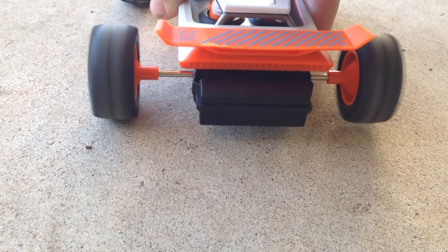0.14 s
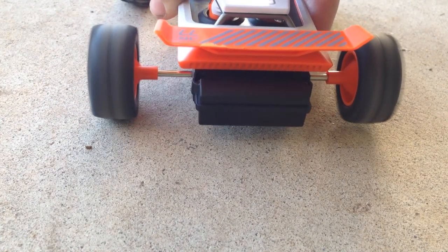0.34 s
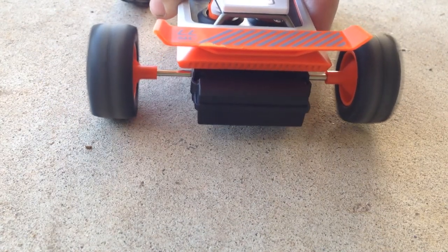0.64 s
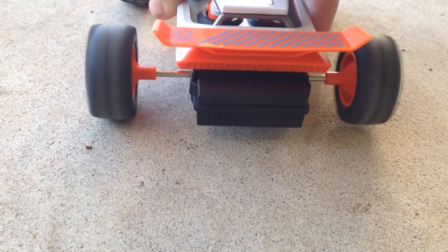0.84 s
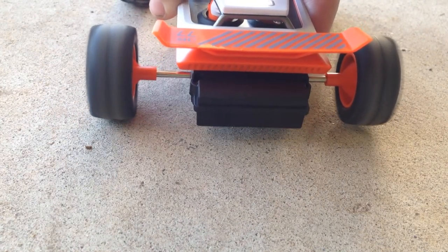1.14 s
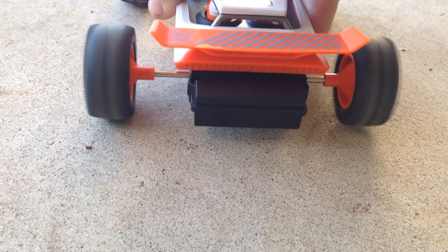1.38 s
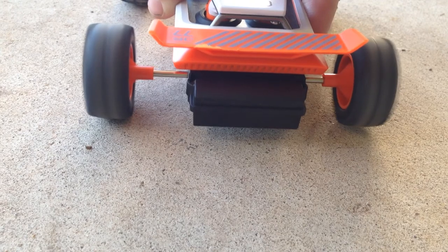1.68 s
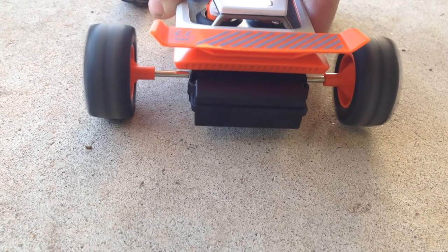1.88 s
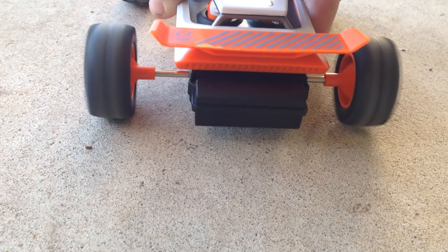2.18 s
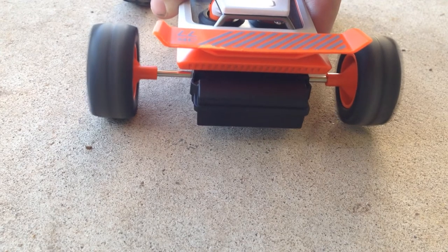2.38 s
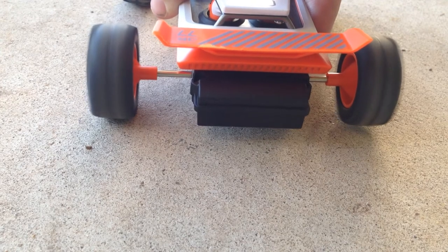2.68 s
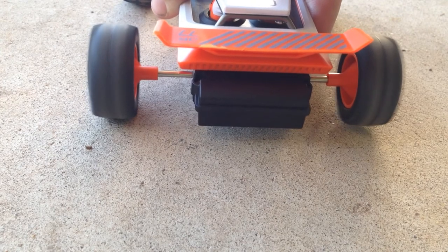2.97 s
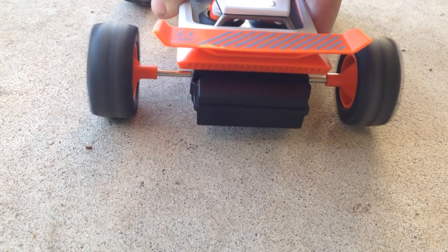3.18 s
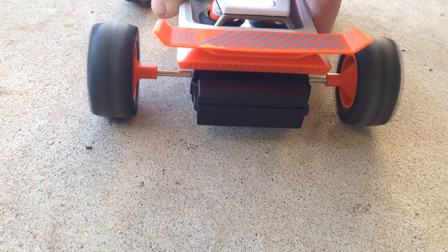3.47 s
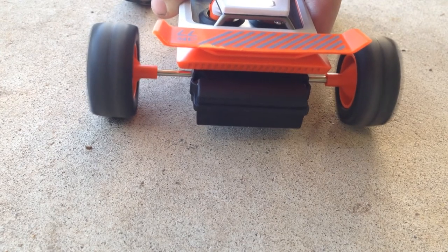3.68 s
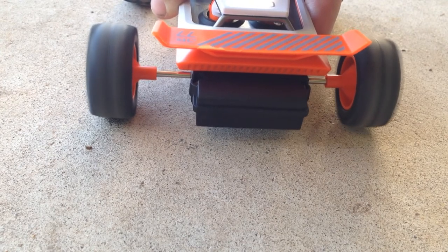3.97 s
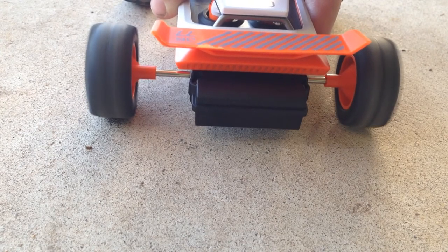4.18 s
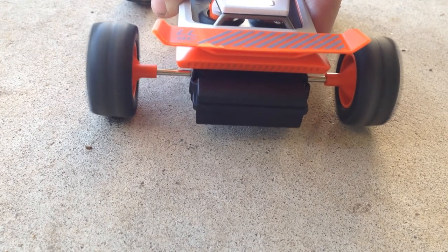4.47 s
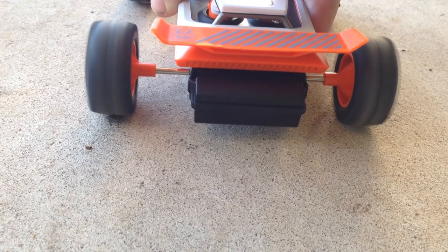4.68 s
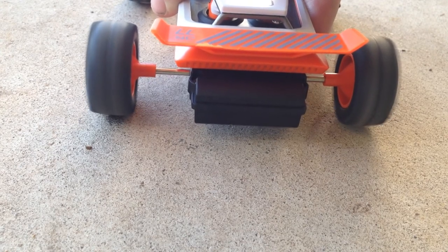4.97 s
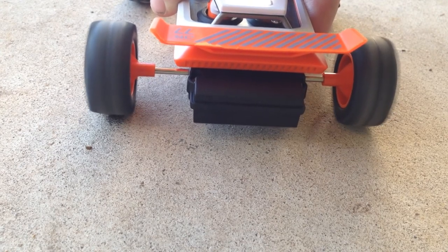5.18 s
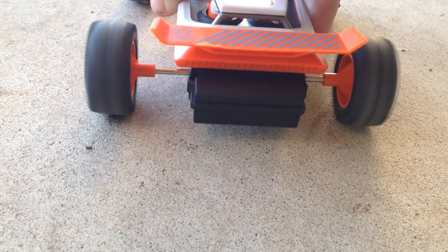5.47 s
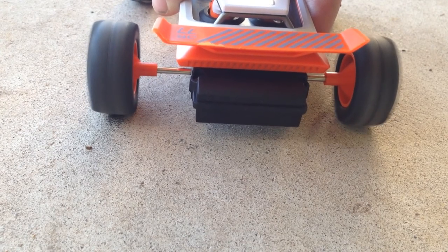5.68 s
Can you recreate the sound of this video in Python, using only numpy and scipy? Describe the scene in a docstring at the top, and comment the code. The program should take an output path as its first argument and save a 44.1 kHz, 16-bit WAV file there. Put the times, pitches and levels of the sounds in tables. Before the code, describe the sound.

A small electric toy car is held with its rear wheels spinning over concrete. Its motor and plastic gearbox give a high, buzzy whine with a dense rattle of loose teeth, the pitch wavering up and down. Partway through, the whine drops lower and labours, then cuts off abruptly at the very end. The car sounds close, with a very faint outdoor rumble far beneath it.

```python
"""A toy car's plastic gearbox whines, rear wheels held spinning over concrete, until the power is cut.
A small motor drives a layshaft through a 9-tooth pinion: this fast mesh whines and loose teeth rattle
through the shell. A slower mesh purrs and slaps as it tightens on each layshaft turn. The pitch follows
the hand pressing and easing. The outdoors rumbles and hums far below."""
import sys
import numpy as np
from scipy import signal
from scipy.fft import rfft, irfft
from scipy.io import wavfile
from scipy.ndimage import uniform_filter1d

SR = 44100
rng = np.random.default_rng(int(sys.argv[2]) if len(sys.argv) > 2 else 0)


def store_pcm(level_fs):
    """Save levels as 16-bit WAV."""
    pcm = np.round(np.clip(level_fs, -1, 1) * 32767).astype(np.int16)
    wavfile.write(sys.argv[1], SR, np.atleast_2d(pcm).T)


N = 257544

# Layshaft speed under the hand. Each row: time in seconds, speed in turns per second.
SPEED_RPS = [(0, 43.95), (0.1, 42.2), (0.24, 47.2), (0.6, 44.8), (0.7, 41.3), (0.87, 40.45), (1.13, 46.9),
             (1.22, 43.9), (1.33, 43.6), (1.41, 42.0), (1.51, 43.1), (1.79, 42.0), (1.99, 46.5),
             (2.1, 44.7), (2.21, 40.45), (2.49, 34.25), (2.61, 34.75), (2.78, 36.2), (2.87, 36.4),
             (3.0, 38.25), (3.32, 35.8), (3.74, 36.0), (3.79, 33.4), (4.01, 30.65), (4.14, 32.75),
             (4.41, 36.8), (4.58, 36.65), (4.69, 34.65), (5.01, 31.3), (5.13, 31.4), (5.26, 32.95),
             (5.53, 34.5), (5.84, 34.2)]
# Wheel load. Each row: time in seconds, load from 0 to 1.
WHEEL_LOAD = [(0, 0.3), (2.2, 0.22), (2.45, 0.88), (5.84, 1)]
# Fast mesh. Each row: harmonic, free level in dB, loaded level in dB, jitter in radians at looseness 1.
WHINE_HARMONICS = [(1, -10.5, -10.5, 1.13), (2, 1.3, -1, 1.04), (3, -8, -7.5, 1.7), (4, -5.5, -12.5, 1.3),
                   (5, -16, -7.5, 0.79), (6, -35, -20, 1.5)]
# Armature hum. Each row: multiple of motor speed, free and loaded level in dB re the purr gain.
ARMATURE_TONES = [(1, -24, -16), (2, -29, -34), (4, -26, -42), (6, 0, 0.5), (8, 0, -1.5)]
# Thin tone of the loaded train: multiple of layshaft speed, free and loaded level in dB re the purr gain.
TRAIN_TONE = (24, -31, -6.5)
# Shell peaks and notches. Each row: centre in Hz, width in Hz, gain in dB.
SHELL_BANDS = [(2665, 400, -3), (3656, 200, 3.5), (4190, 312, 7), (5840, 350, -4.5), (6130, 250, 2.5),
               (8080, 360, -6.5), (8620, 210, 6), (8914, 187, -24), (9900, 800, 3), (12700, 180, -13)]
SHELL_BANDS += [(12050, 180, -7)]
# Noise spectra. Each row: frequency in Hz, relative density in dB.
RATTLE_SPECTRUM = [(300, -63.5), (520, -37), (780, -26), (950, -18), (1530, -10.5), (2100, -18.5),
                   (2900, -13.5), (4500, -4.5), (5850, -12), (8060, -12), (10000, -5.5), (12700, -6),
                   (13700, -25), (15300, -15.5)]
SLAP_SPECTRUM = [(450, -29.5), (750, -6), (1000, -11.5), (1550, -1.5), (2300, -2.5), (3200, -27), (6000, 0),
                 (12000, -47)]
RUMBLE_SPECTRUM = [(15, -52), (25, -22), (43, -11), (92, -1), (136, -5.5), (200, -1), (226, 2), (277, -8),
                   (341, -11), (404, -11), (450, -24), (580, -52), (990, -120)]
# Far machines. Each row: frequency in Hz, mean level in dB.
FAR_HUMS = [(60, -74), (102, -74.5)]
# The car nudges the ground. Each row: start in seconds, added peak in dB re the rumble.
GROUND_BUMPS = [(0.47, 6)]
# Response to the drive. Each row: free value, loaded value, change per turn/s of racing,
# change per turn/s of labouring, step at the power cut.
WHINE_DB = (-22.5, -20.5, -.5, -0.82, -7.5)
RATTLE_DB = (-22.5, -24, 0.08, -0.44, -2.5)
PURR_DB = (-44, -44.5, -0.58, -0.32, -6)
SLAP_DB = (-38.5, -40, 1, -.5, 3)
THROB_DEPTH_DB = (0.08, -0.33, 0.26, 0.48, -0.49)
MESH_LOOSENESS = (0.7, 0.74, .08, 0.095, 0.82)

MOTOR_PER_LAYSHAFT, PINION_TEETH, SLOW_TEETH = 6.51, 9, 17
RACING_FREE_RPS, RACING_LOADED_RPS, LABOURING_RPS = 42.2, 35.5, 35.3
POWER_CUT_S, SLACK_AFTER_S, LET_GO_S = 5.757, 0.012, 0.0036
INERTIA_S, BRAKE_S, COAST_SHARE, FADE_DB_PER_S = 0.03, 0.03, 0.66, 88
BOUNCE_PEAK_S, BOUNCE_PERIOD_S, BOUNCE_DB = 5.79, 0.026, 3
RUMBLE_DB, CUTOFF_HZ = -61.5, 15300


def whine(shaft_rad, motor_rad, load, looseness):
    """Pinion teeth meet early or late: by chance, and in a pattern tied to both gears' turns."""
    pattern_rad = 0.27 * np.cos(shaft_rad) + 0.38 * np.cos(2 * shaft_rad) + 0.31 * np.cos(motor_rad)
    out = 0
    for harmonic, free_db, loaded_db, jitter_rad in WHINE_HARMONICS:
        force = 1 + 0.41 * looseness * wander(212)   # worn teeth push unevenly
        timing_rad = harmonic ** 0.9 * pattern_rad + jitter_rad * looseness * wander(115)
        tone = np.cos(harmonic * PINION_TEETH * motor_rad + timing_rad)
        out += load_gain(free_db, loaded_db, load) * force * tone
    return out


def rattle():
    """Loose teeth: dense knocks of uneven size."""
    knocks = rng.standard_normal(N) * from_db(1.6 * wander(780))
    return coloured(knocks, RATTLE_SPECTRUM)


def shell(x):
    """The plastic shell filters the gears through a chain of peaks and notches."""
    for hz, width_hz, db in SHELL_BANDS:
        gain, step_rad = np.sqrt(from_db(db)), 2 * np.pi * hz / SR
        alpha = np.sin(step_rad) * width_hz / hz / 2
        b = [1 + alpha * gain, -2 * np.cos(step_rad), 1 - alpha * gain]
        a = [1 + alpha / gain, -2 * np.cos(step_rad), 1 - alpha / gain]
        x = signal.lfilter(b, a, x)
    return x


def mesh_tightness(shaft_rad, grip):
    """An off-centre, oval gear tightens the slow mesh once and twice a turn."""
    off_centre = (0.55 - 0.068 * grip) * np.cos(shaft_rad - 0.6)
    oval = 1.1 * np.cos(2 * shaft_rad) + 0.083 * np.cos(4 * shaft_rad)
    return 1 + off_centre + oval


def purr(shaft_rad, tightness):
    """Slow mesh tone, hurried where the gear is tightest; the shell passes no bass."""
    mesh_rad = SLOW_TEETH * shaft_rad + 0.11 * np.sin(2 * shaft_rad)
    tone = tightness * from_db(1.2 * wander(18)) * np.cos(mesh_rad)
    return signal.sosfilt(signal.butter(4, 640, "high", fs=SR, output="sos"), tone)


def slap(shaft_rad, tightness, repeat_share=0.87):
    """Slack teeth knock as the slow mesh tightens, much alike on every turn."""
    position = (shaft_rad / (2 * np.pi) * 1024).astype(int) % 1024
    wear = rng.standard_normal(1024)[position]
    knocks = repeat_share * wear + (1 - repeat_share) * rng.standard_normal(N)
    return coloured(knocks * np.maximum(tightness, 0.1) ** 1.5, SLAP_SPECTRUM)


def drive_tones(shaft_rad, motor_rad, grip):
    """Armature and loaded train hum, wavering in level."""
    lines = [(motor_rad, row) for row in ARMATURE_TONES] + [(shaft_rad, TRAIN_TONE)]
    out = 0
    for angle_rad, (multiple, free_db, loaded_db) in lines:
        rms = load_gain(free_db, loaded_db, grip) * from_db(1.8 * wander(5.4))
        out += np.sqrt(2) * rms * np.cos(multiple * angle_rad)
    return out


def drive():
    """Gears race and go slack when fast, the motor labours when slow, and all fades at the power cut."""
    t = np.arange(N) / SR
    load = timeline(WHEEL_LOAD)
    speed_rps = uniform_filter1d(timeline(SPEED_RPS), size=int(INERTIA_S * SR), mode="nearest")
    racing_rps = np.maximum(speed_rps - RACING_FREE_RPS - (RACING_LOADED_RPS - RACING_FREE_RPS) * load, 0)
    labouring_rps = np.maximum(LABOURING_RPS - speed_rps, 0)
    grip = np.clip(load - 0.45 * racing_rps, 0, 1)   # the racing slow mesh sheds load
    off_s = np.maximum(t - POWER_CUT_S, 0)
    slack = 1 - np.exp(-np.maximum(off_s - SLACK_AFTER_S, 0) / LET_GO_S)
    rows = (WHINE_DB, RATTLE_DB, PURR_DB, SLAP_DB, THROB_DEPTH_DB, MESH_LOOSENESS)
    responses = [free + (loaded - free) * load + race * racing_rps + labour * labouring_rps + step * slack
                 for free, loaded, race, labour, step in rows]
    # freed teeth bounce between their neighbours
    bounce_db = slack * BOUNCE_DB * np.cos(2 * np.pi * (t - BOUNCE_PEAK_S) / BOUNCE_PERIOD_S)
    coast_db = bounce_db - FADE_DB_PER_S * off_s
    speed_rps *= COAST_SHARE + (1 - COAST_SHARE) * np.exp(-off_s / BRAKE_S)
    return speed_rps, load, grip, coast_db, responses


def outdoors():
    """Far rumble and machine hum; the rumble jumps as the car nudges the ground."""
    t = np.arange(N) / SR
    rumble = from_db(RUMBLE_DB) * coloured(rng.standard_normal(N), RUMBLE_SPECTRUM)
    hum = sum(np.sqrt(2) * from_db(db + 7.6 * wander(6.6)) * np.sin(2 * np.pi * hz * t)
              for hz, db in FAR_HUMS)
    bumps = sum(from_db(db) * (t > start_s) * np.exp(-np.abs(t - start_s) / 0.013)
                for start_s, db in GROUND_BUMPS)
    return rumble * (1 + bumps) + hum


def from_db(db):
    return 10 ** (np.asarray(db) / 20)


def load_gain(free_db, loaded_db, load):
    return from_db(free_db + (loaded_db - free_db) * load)


def unit_rms(x):
    return x / np.sqrt(np.mean(np.abs(x) ** 2) + 1e-20)


def timeline(rows):
    return np.interp(np.arange(N) / SR, *np.transpose(rows))


def coloured(noise, spectrum):
    """Noise shaped on a log-frequency axis; rms 1."""
    bin_hz = np.maximum(np.arange(N // 2 + 1) * SR / N, 1)
    hz, db = np.transpose(spectrum)
    gain = from_db(np.interp(np.log(bin_hz), np.log(hz), db))
    return unit_rms(irfft(rfft(noise) * gain, N))


def wander(rate_hz):
    """Noise through two one-pole low-passes; rms 1."""
    pole = np.exp(-2 * np.pi * rate_hz / SR)
    return unit_rms(signal.lfilter([1], [1, -2 * pole, pole * pole], rng.standard_normal(N + SR))[SR:])


def scene():
    """Fast mesh through the shell, plus slow mesh, drive tones and outdoors; mono."""
    speed_rps, load, grip, coast_db, responses = drive()
    whine_db, rattle_db, purr_db, slap_db, throb_db, looseness = responses
    shaft_rad = 2 * np.pi * np.cumsum(speed_rps) / SR + 2.1
    # gear play lets the motor lead and lag
    motor_rad = MOTOR_PER_LAYSHAFT * shaft_rad + 0.12 * wander(17.1) + 0.057 * np.sin(shaft_rad)
    tightness = mesh_tightness(shaft_rad, grip)
    # contact force pulses with layshaft and motor
    force_db = throb_db * np.cos(shaft_rad - 0.3) + 0.83 * np.cos(2 * shaft_rad - 0.3)
    force_db += 1.24 * np.cos(motor_rad)
    gears = from_db(whine_db) * whine(shaft_rad, motor_rad, load, looseness)
    gears += from_db(rattle_db) * rattle()
    car = shell(from_db(force_db) * gears)
    car += from_db(purr_db) * (purr(shaft_rad, tightness) + drive_tones(shaft_rad, motor_rad, grip))
    car += from_db(slap_db) * slap(shaft_rad, tightness)
    return (from_db(coast_db) * car + outdoors())[None]


def record(dry):
    """Soft clip, then a steep low-pass."""
    ceiling = 0.67
    low_pass = signal.ellip(14, 0.5, 60, CUTOFF_HZ, fs=SR, output="sos")
    return signal.sosfilt(low_pass, ceiling * np.tanh(dry / ceiling))


dry = scene()
out = record(dry)
store_pcm(out)
```